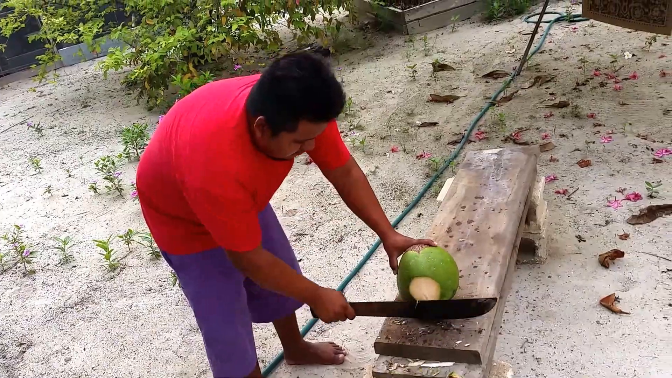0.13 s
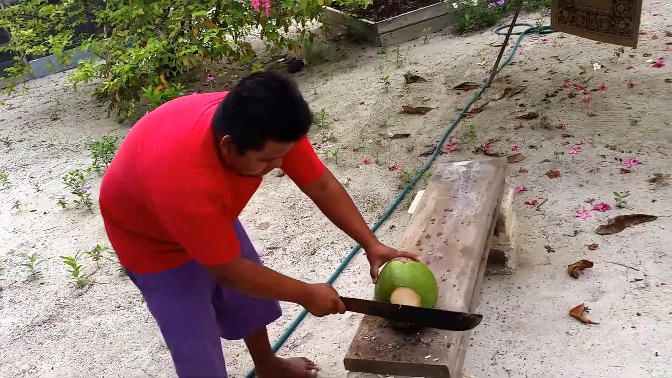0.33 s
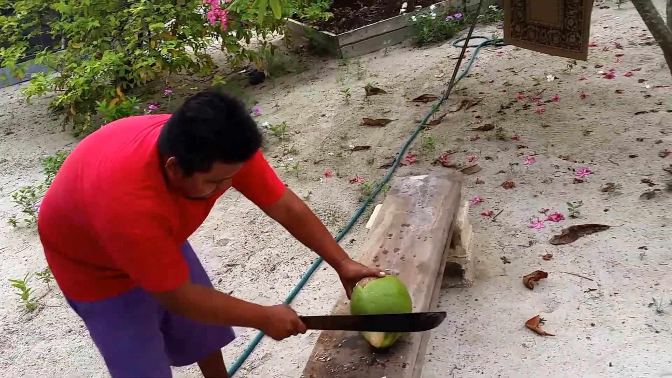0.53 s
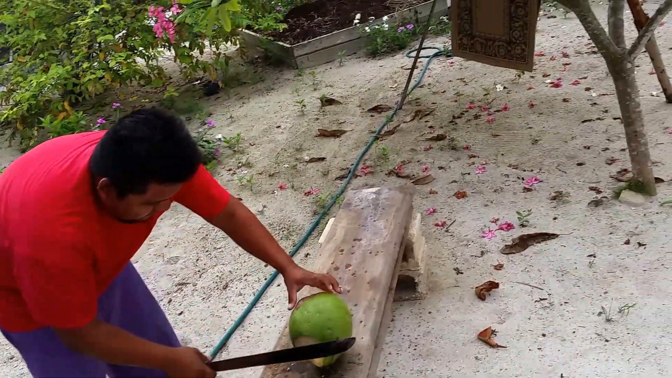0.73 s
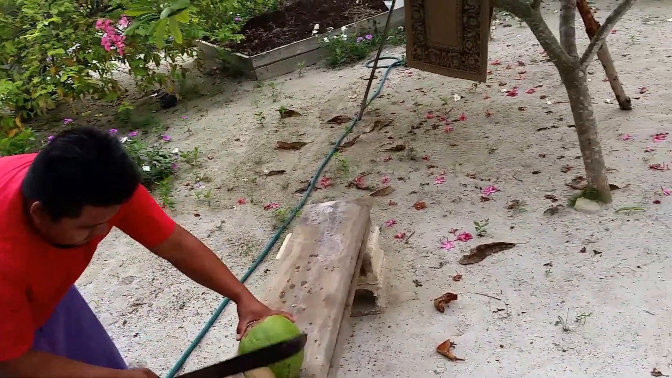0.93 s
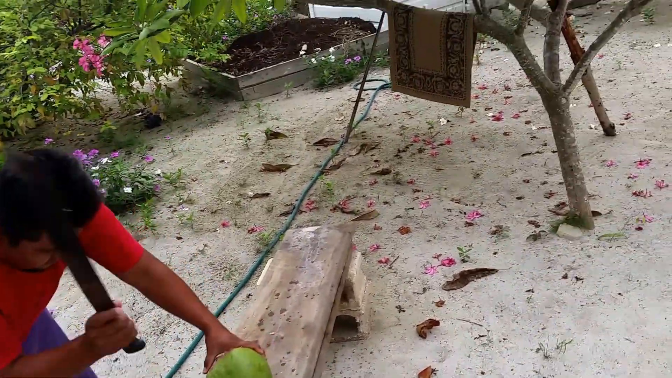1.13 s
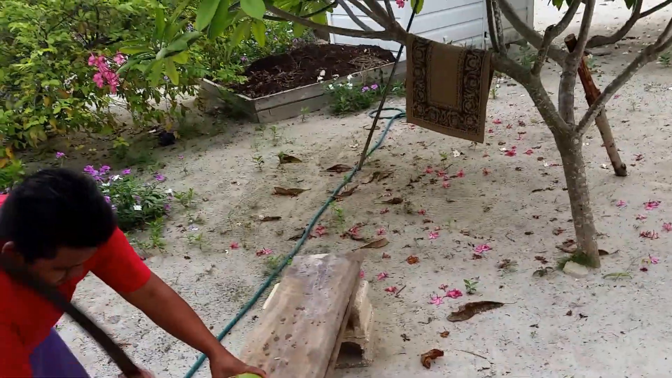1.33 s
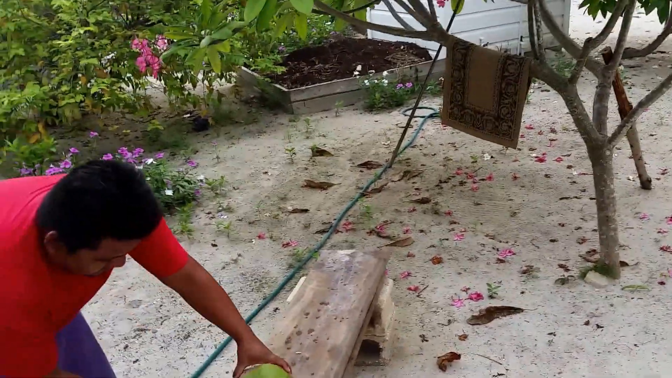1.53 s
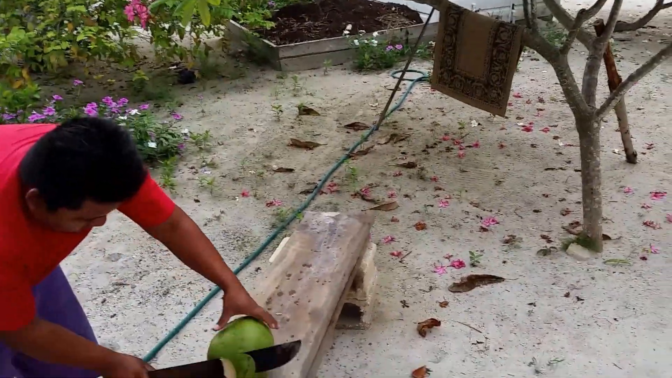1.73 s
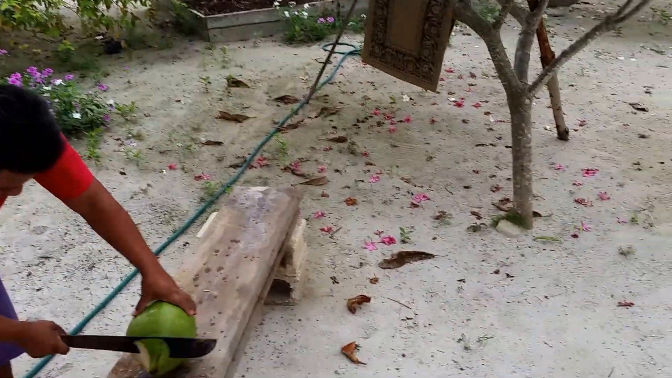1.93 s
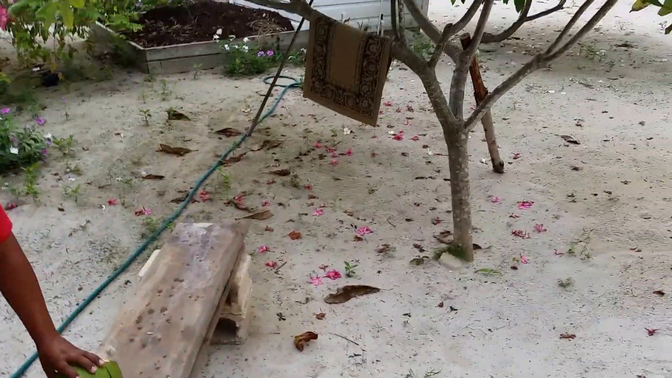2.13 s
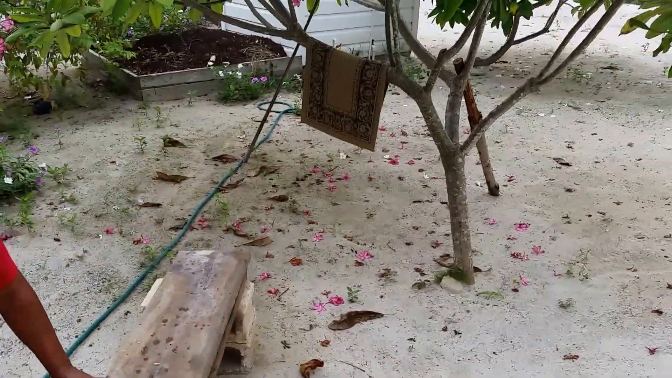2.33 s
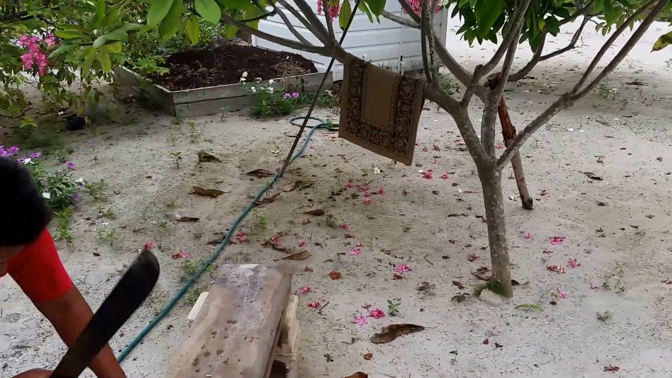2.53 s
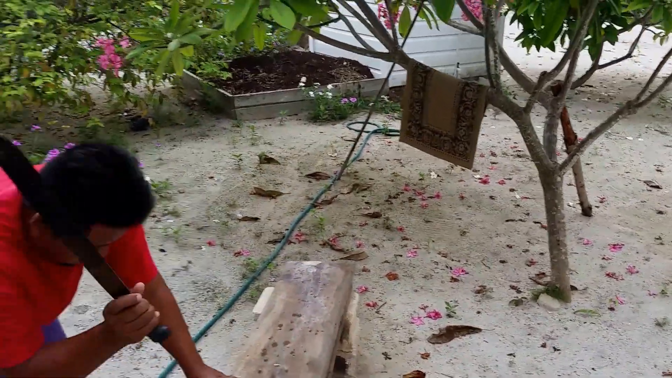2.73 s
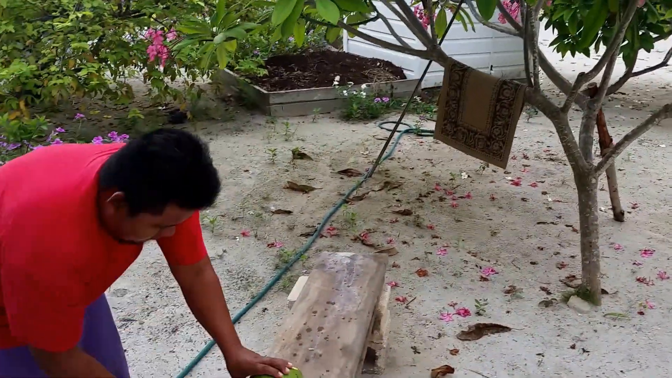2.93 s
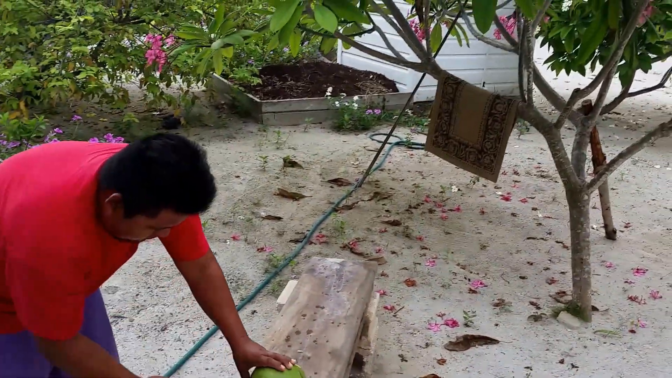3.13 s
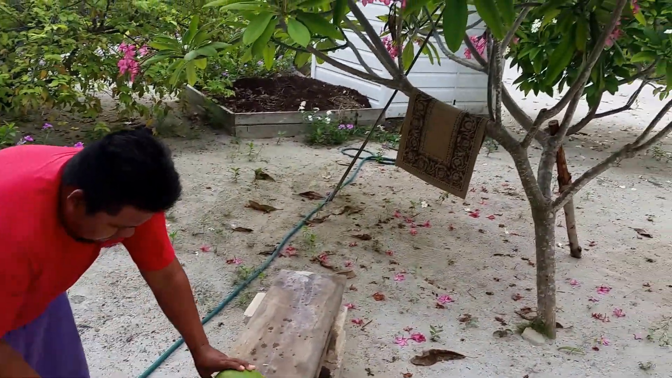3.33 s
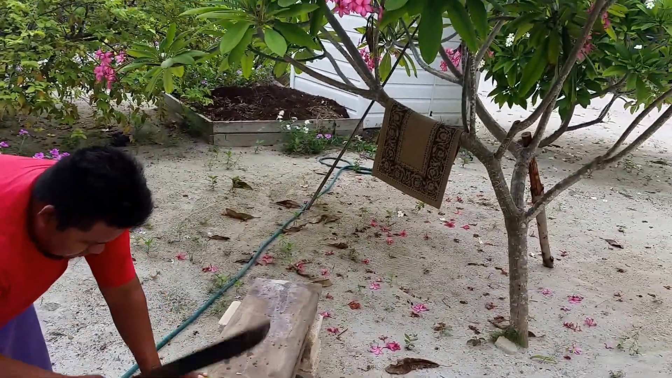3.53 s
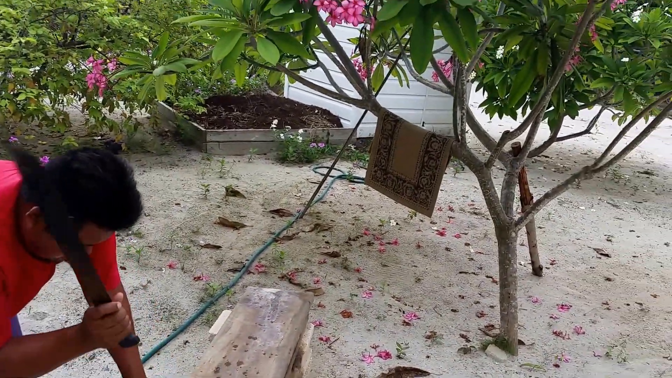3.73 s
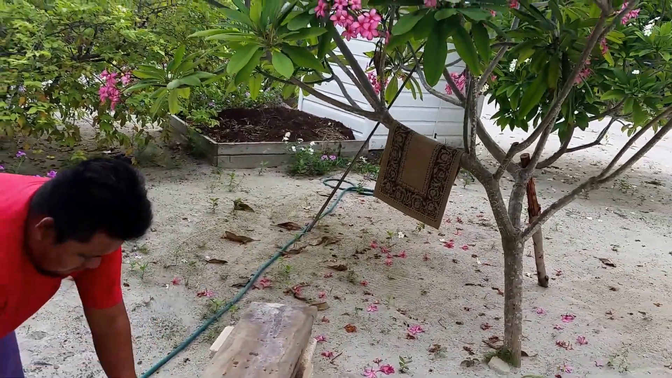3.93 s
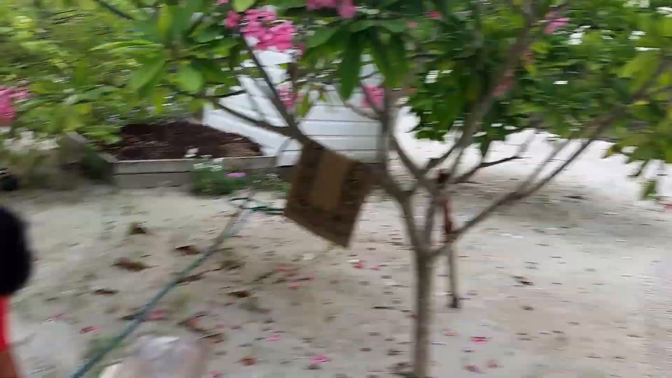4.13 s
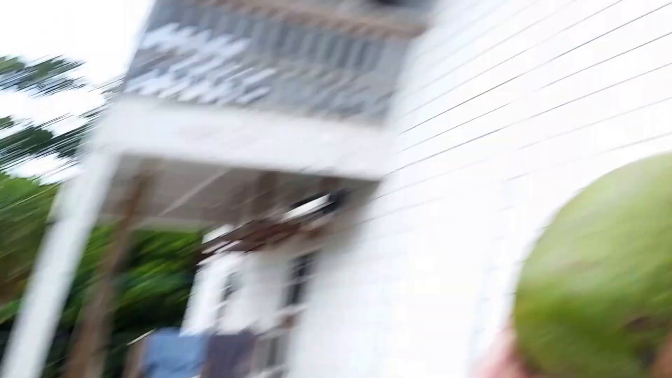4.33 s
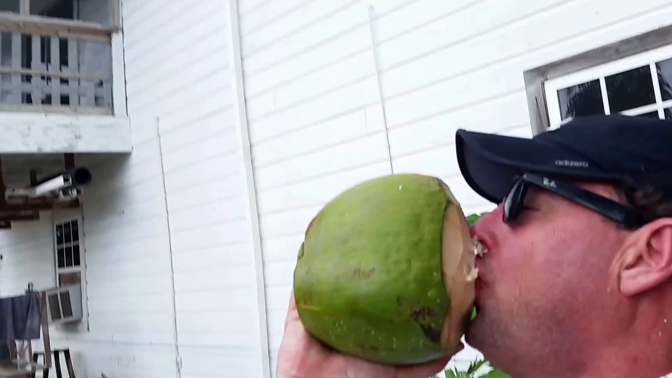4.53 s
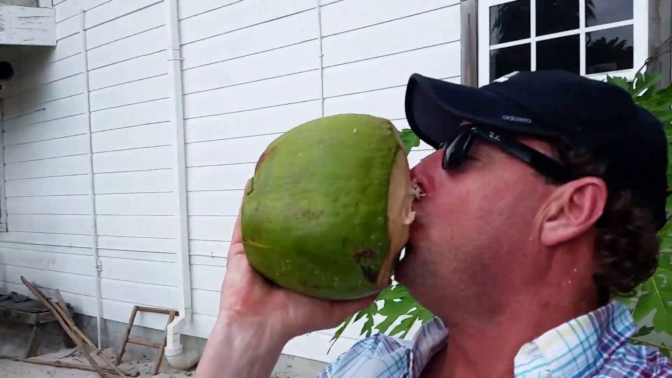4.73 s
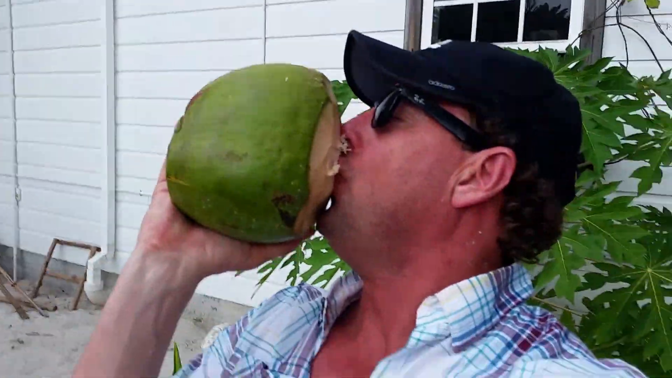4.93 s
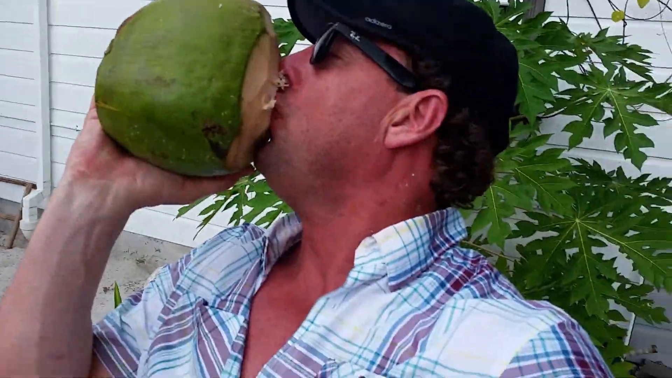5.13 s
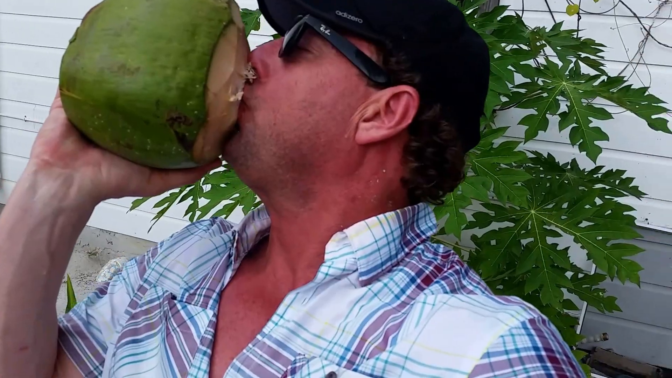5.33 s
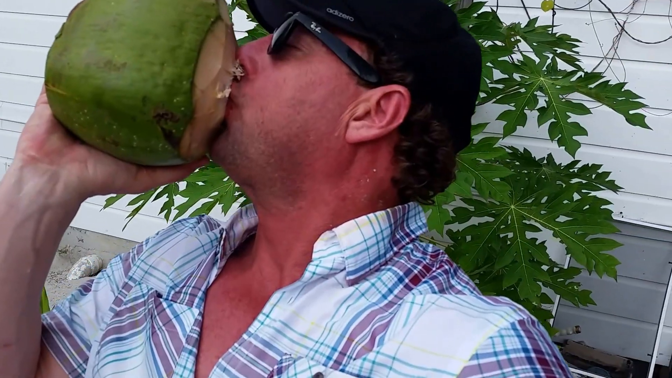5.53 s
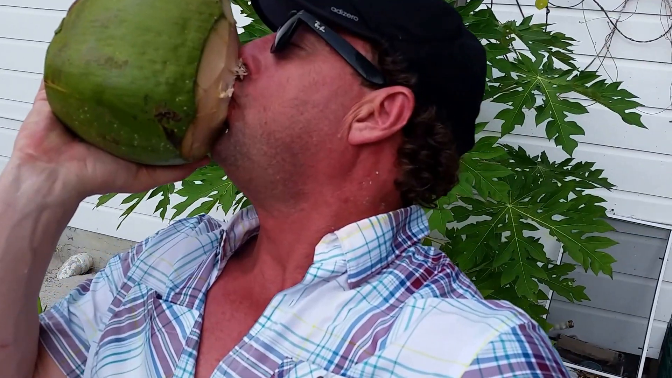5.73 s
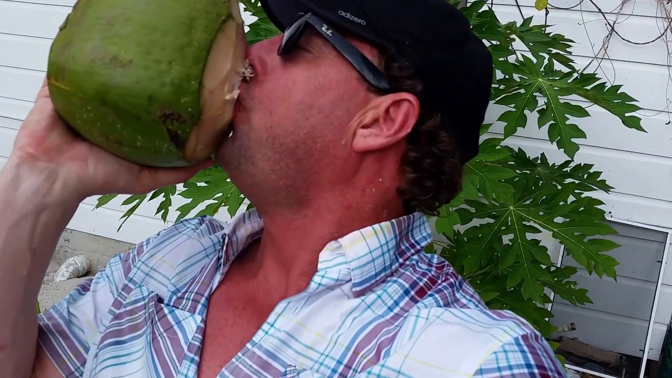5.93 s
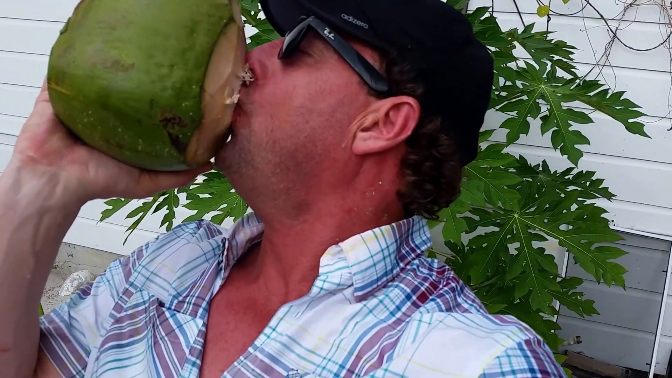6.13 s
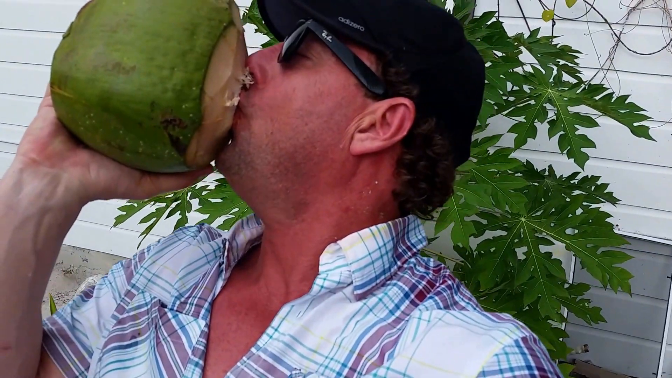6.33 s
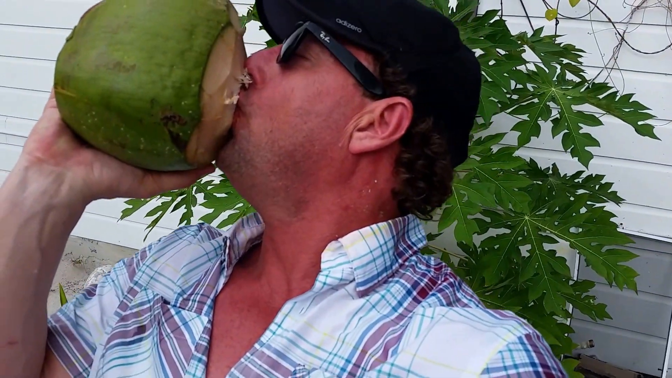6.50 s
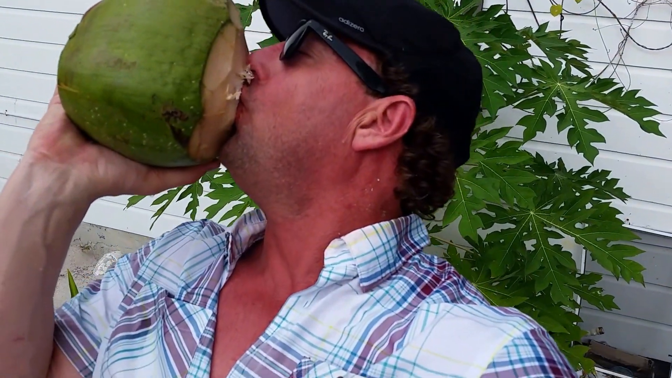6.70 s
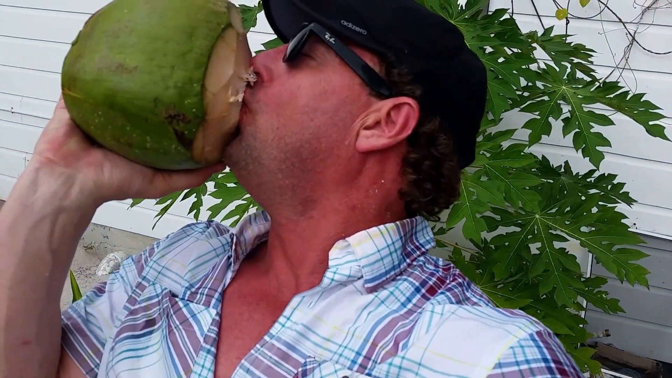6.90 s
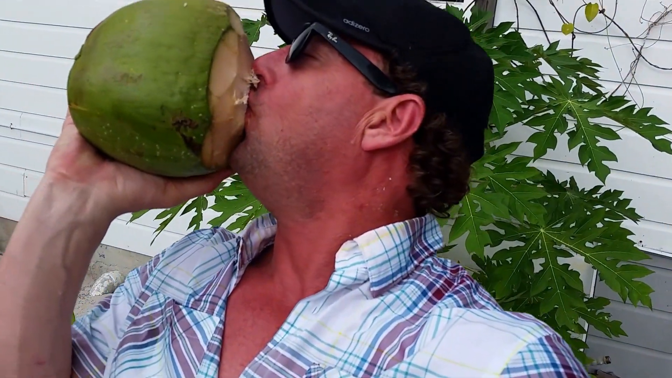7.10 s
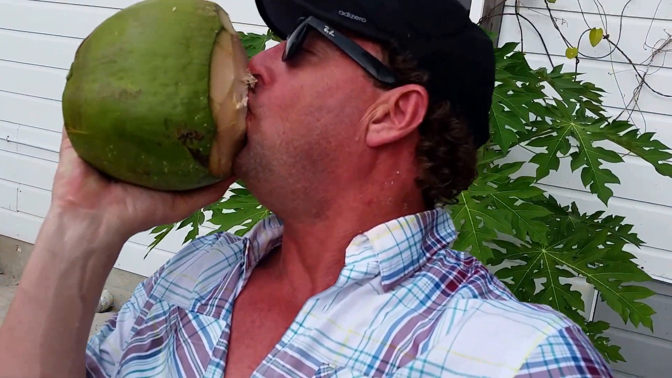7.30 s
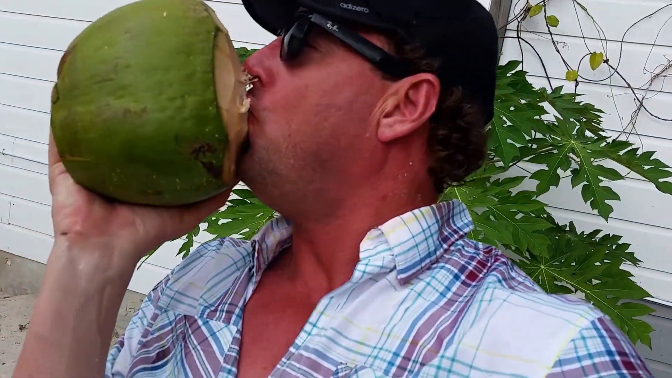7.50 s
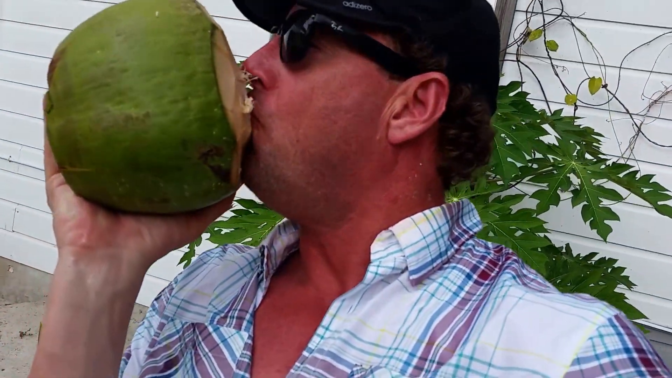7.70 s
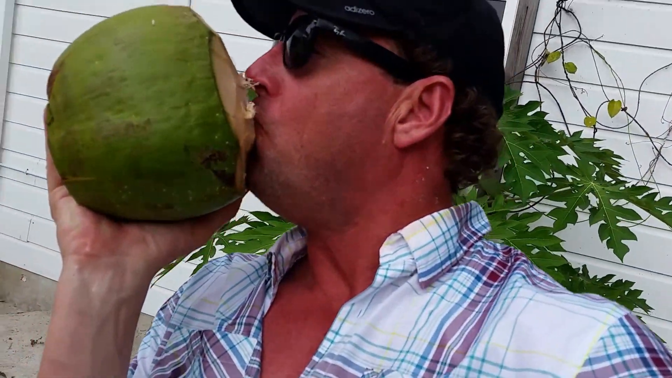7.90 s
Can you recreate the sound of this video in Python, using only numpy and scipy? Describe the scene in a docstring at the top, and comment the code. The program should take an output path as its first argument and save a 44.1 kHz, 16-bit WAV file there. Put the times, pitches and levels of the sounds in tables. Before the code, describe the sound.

An outdoor yard with soft air, leaves, low distant machine hum and a short diffuse echo. At 0.1 s a machete hits a coconut on a plank: the loudest woody crack, a wet crunch and a brief clatter. Light scrapes and tiny steel rings follow; at 0.8 s a snap and scrape, then a faint hoarse rising squeal until about 1.4. A chop at 1.54 brings several quick knocks until 1.8. Husk ticks and tears at 2.0-2.5. A chop at 3.06 leads to creaking fingers on the microphone and a dense, sharp ripping crackle at 3.3-3.5. A duller chop lands at 4.05, then bumps, low rumble, finger ticks and a click at 4.48. Another chop at 5.67, a rip at 5.9, and busy case creaks around 6.1-6.5. A chop at 6.66 precedes tearing, scraping and soft palm swishes, with a last crunchy cut at 7.9.

```python
"""A machete trims a green coconut on a wooden plank in a sandy yard: chops and rips burst wet husk fibres.
The blade also scrapes and levers slices off, tearing and snapping fibres (ticks ringing fibre modes).
Blade, nut and slices knock on the plank (struck modes and noise), and the steel rings and squeals.
A hand-held microphone creaks under the fingers, swishes under the palm and rumbles as it is moved.
Behind lie the yard's echo, open air, leaves (shaped noise) and the hum of far machines (sines)."""
import sys
import numpy as np
from scipy import signal
from scipy.fft import rfft, irfft
from scipy.io import wavfile
from scipy.ndimage import uniform_filter1d

SR = 44100
rng = np.random.default_rng(int(sys.argv[2]) if len(sys.argv) > 2 else 0)


def store_pcm(level_fs):
    """Save levels as 16-bit WAV."""
    pcm = np.round(np.clip(level_fs, -1, 1) * 32767).astype(np.int16)
    wavfile.write(sys.argv[1], SR, np.atleast_2d(pcm).T)


N = 351036
TIME = np.arange(N) / SR
AGE = TIME[:SR * 3 // 4]  # seconds since a strike, up to 0.75 s

# Table levels are relative: each function trims its own layers. A positive left_right_db is louder on the left.
# Modes of the steel blade, before the damping by husk: mode_hz, level_db, t60_s
BLADE = [(2580, 2.5, 0.5), (2716, 10, 0.14), (3190, 3, 0.8), (3740, -9, 0.69), (4226, -5.5, 0.55),
         (4630, 1.5, 0.71), (5002, 3, 0.5), (5930, 1.5, 0.355), (6400, -6.5, 0.5), (6360, -2, 0.24),
         (6900, -13, 0.45), (7478, -10, 0.85), (8300, -8.5, 0.42), (9000, -5.5, 0.25), (11080, -11.5, 0.6)]
# Colour of the nut's body, a power density: freq_hz, level_db
NUT_COLOUR = [(80, -21.5), (200, 13), (400, 0), (620, 4), (1000, 4), (1500, -3), (2300, -4), (3500, -23),
              (8000, -54.5)]
# Modes of the microphone's case: mode_hz, level_db, t60_s
CASE = [(1036, -1, 0.01), (2260, 2, 0.0057), (3370, -4, 0.005), (4100, -0.5, 0.0044), (5770, 1, 0.0049),
        (6550, 4, 0.0033), (7370, -1, 0.0038), (8320, 0.5, 0.0031), (10030, -10, 0.0045),
        (14200, -5, 0.0021)]


def chops(crunch_db=-7, thud_db=-1, steel_db=-17, stop_t60=0.03, nut_ring_db=-7,
          fibres_per_cut=70, entry_db=-1, entry_t60=0.0025, nut_t60=0.28):
    """A hard onset, then a run of bursting fibres, sparser in a long rip; the nut thuds and the steel rings."""
    # Blade cuts and longer rips of the husk:
    # start_s, crunch_db, length_s, thud_db, thud_hz, left_right_db, steel_ring_db
    cuts = [(0.08, -19, 0.01, -23.5, 1110, -3.5, -52), (0.1013, -18, 0.0026, -15.5, 1410, -6.5, -24),
            (1.536, -13, 0.0046, -17, 1490, -1, -73), (3.060, -15.5, 0.0052, -18.5, 1000, -4, -61),
            (3.297, -31.5, 0.067, -50, 1410, 1, -32), (4.053, -17, 0.0077, -20, 1060, -1, -33),
            (5.6741, -17.5, 0.0084, -21, 630, 4.5, -46), (5.895, -25, 0.024, -45, 587, 3, -40),
            (6.657, -12.5, 0.0026, -20, 430, 5, -32), (7.93, -16, 0.014, -32, 790, 4, -51)]
    # Colour of bursting wet husk, a power density: freq_hz, level_db
    crunch_colour = [(300, 10), (1200, -70), (2300, 4.5), (3500, 4), (7500, 7), (11000, -2.5), (16000, 2.5)]
    crunch, thud, steel = np.zeros((3, 2, N))
    entry = 1 + from_db(entry_db) * dying(entry_t60)
    blade_ring = steel_modes().sum(1)
    for s, db, length, nut_db, nut_hz, pan, ring_db in cuts:
        # The force lasts for the length of the cut or rip, then dies away
        force = entry * np.exp(-np.log(1000) * np.maximum(AGE - length, 0) / stop_t60)
        breaks = rng.random(len(AGE)) < fibres_per_cut / length / SR
        fibres = rms_one(np.sign(stereo_noise(0.7, size=len(AGE))) * breaks)
        add(crunch, s, from_db(db) * panned(pan) * fibres * force)

        push = stereo_noise(0.97, size=len(AGE)) * (force + from_db(nut_ring_db) * dying(nut_t60))
        body = signal.butter(1, [nut_hz / 2, nut_hz * 2], "band", fs=SR, output="sos")
        add(thud, s, from_db(nut_db) * signal.sosfilt(body, push))
        add(steel, s, from_db(ring_db + steel_db) * blade_ring)
    crunch = from_db(crunch_db) * coloured(crunch, crunch_colour)
    thud = from_db(thud_db) * coloured(thud, NUT_COLOUR)
    return crunch + thud + steel


def pings(focus_q=4):
    """The blade springs free or is tapped, and rings briefly in the modes near the contact's pitch."""
    # Touches on the steel: start_s, level_db, contact_hz
    touches = [(0.281, -52, 3500), (0.27, -52.5, 7700), (0.622, -73, 3560), (0.7, -67.5, 3260),
               (0.81, -48, 3230), (0.881, -51, 3200), (0.9, -54, 6700), (2.372, -55, 6600),
               (4.917, -41.5, 7940), (4.934, -64, 7760), (5.932, -54, 6650), (5.938, -45, 2350),
               (7.419, -50, 7700)]
    out = np.zeros((2, N))
    blade = steel_modes()
    for s, db, hz in touches:
        add(out, s, from_db(db) * favoured(BLADE, hz, focus_q) @ blade)
    return out


def tearing(level_db=-9.0, ticks_per_s=400, spread_db=4.0, rasp_db=-6, snap_db=-8.0,
            rise_s=0.0001, vary_db=3.0, size=1024):
    """Husk gives way: a fine rasp, uneven ticks and loud snaps ring the fibres in a mix that keeps shifting."""
    # Husk scraped or levered apart: start_s, attack_s, hold_s, release_t60_s, level_db, left_right_db
    tears = [(0.803, 0.0074, 0.02, 0.54, -46, -5), (2.038, 0.077, 0.22, 0.26, -47, 2.5),
             (2.25, 0.029, 0.0083, 0.055, -44, 4), (2.315, 0.012, 0.033, 0.16, -36.5, 2.5),
             (2.403, 0.01, 0.0093, 0.056, -35.5, 2.5), (3.15, 0.018, 0.17, 0.1, -42.5, -1),
             (3.29, 0.017, 0.035, 0.18, -24.5, -0.5), (3.365, 0.054, 0.061, 0.43, -32, -0.5),
             (5.879, 0.0058, 0.024, 0.43, -35.5, 11), (6.787, 0.03, 0.11, 0.42, -36.5, 1.5),
             (7.161, 0.16, 0.098, 0.087, -43, 9.5)]
    # Single fibre bundles breaking: start_s, level_db, left_right_db
    snaps = [(0.508, -29.5, -11), (0.7967, -19, -5), (0.805, -23, -2), (2.104, -28, 2), (2.134, -27, 2),
             (2.199, -20, 2), (2.286, -15, -4), (2.339, -19, 7), (2.355, -17, -4), (2.368, -28, 0),
             (2.421, -14.5, -5), (3.288, -6, 8), (3.301, -2, -3), (3.3052, -7, -2), (3.309, -9, 0),
             (3.3178, 1, -3), (3.326, -4, 2), (3.3361, -3, 0), (3.418, -17, -5), (3.43, -3, -4),
             (3.453, -7, 2), (3.463, -7, 2), (3.472, -14, 4), (3.5, -7.5, -9), (5.8954, -5.5, 8),
             (5.9, -17, 5), (5.934, -8, 0), (6.882, -12, 0), (7.047, -15, 5.5), (7.25, -22, 11),
             (7.415, -15, 8), (7.868, -6, -5)]
    # Fibre bundles ring for an instant as they break: mode_hz, level_db, t60_s
    fibre_modes = [(1000, 7.5, 0.0037), (1840, 1.5, 0.014), (2530, 7.5, 0.0022), (4430, 2.5, 0.0042),
                   (5510, 8.5, 0.001), (5900, 0.5, 0.006), (7280, 4.5, 0.0068), (8460, 0, 0.012),
                   (10070, 3.5, 0.0024), (11250, -2.5, 0.0063), (12700, 3.5, 0.0022), (14600, 3.5, 0.0041)]
    to_right_db = 3  # tears and snaps all lie this much further right than their tables say
    effort = sum(from_db(db) * panned(pan - to_right_db) * gesture(*shape) for *shape, db, pan in tears)

    strength = from_db(spread_db * np.minimum(rng.exponential(1, N), 2))
    ticks = (rng.random(N) < ticks_per_s / SR) * strength
    # Even out the local power of the ticks
    ticks /= np.sqrt(np.abs(uniform_filter1d(ticks ** 2, size=3000)) + 1e-4)
    force = from_db(level_db) * effort * (ticks + from_db(rasp_db) * stereo_noise(0.035))
    for s, db, pan in snaps:
        add(force, s, from_db(db + snap_db) * panned(pan - to_right_db))

    out, age = 0, AGE[:size]
    for hz, db, t60 in fibre_modes:
        ring = np.sin(2 * np.pi * (hz * age + rng.random((2, 1)) / 2))
        ring = ring * dying(t60)[:size] * (1 - np.exp(-age / rise_s))
        ring /= np.linalg.norm(ring[0])
        drive = force * rng.choice([-1, 1], N) * swelling(vary_db, hold_s=0.011)
        out = out + from_db(db) * signal.oaconvolve(drive, ring, axes=1)[:, :N]
    return out / np.linalg.norm(from_db(np.array(fibre_modes)[:, 1]))


def sliding(rub_db=-11, dragged_t60=0.2):
    """Friction hisses, makes the blade sing and, under pressure, rasps in the nut."""
    # Blade sliding over the husk; the singing is relative to the level:
    # start_s, attack_s, hold_s, release_t60_s, level_db, pressure_db, singing_db
    strokes = [(0.328, 0.027, 0.015, 0.067, -44.5, -59.5, -18.5),
               (0.584, 0.044, 0.0085, 0.064, -45.5, -69.5, -15.5),
               (0.791, 0.005, 0.013, 0.45, -33, -60, -23), (0.802, 0.074, 0.2, 0.36, -47.5, -48, -15),
               (1.353, 0.076, 0.063, 0.33, -40, -50.5, -37), (7.416, 0.14, 0.51, 0.26, -45.5, -49.5, -21),
               (7.846, 0.024, 0.015, 0.14, -40, -53, -20)]
    # Colour of rubbed steel, a power density: freq_hz, level_db
    rub_colour = [(500, -30), (2000, -23), (3200, 4.5), (4500, 6), (8000, 4), (11000, -13.5), (16000, -1.5)]
    speed, pressure, singing = np.zeros((3, N))
    for *shape, db, pressure_db, sing_db in strokes:
        stroke = gesture(*shape)
        speed += from_db(db) * stroke
        pressure += from_db(pressure_db) * stroke
        singing += from_db(db + sing_db) * stroke
    friction = coloured(stereo_noise(0.98) * swelling(depth_db=2.0, hold_s=0.005), rub_colour)
    # Dragging over the husk damps the blade further
    steel = ringing(BLADE).sum(0) * dying(dragged_t60)
    song = signal.oaconvolve(singing * friction, steel[None] / np.linalg.norm(steel), axes=1)[:, :N]
    rasp = coloured(pressure * rng.standard_normal(N), NUT_COLOUR)
    return from_db(rub_db) * speed * friction + song + rasp


def squealing(start_hz=3140, rise_hz_per_s=670, level_db=-55, width_hz=110):
    """The dragged blade squeals faintly at a rising pitch, made hoarse by a slow random flutter."""
    # The drag: start_s, attack_s, hold_s, release_t60_s
    drag = (0.93, 0.048, 0.17, 0.28)
    hz = start_hz + rise_hz_per_s * (TIME - drag[0])
    lowpass = signal.butter(2, width_hz, fs=SR, output="sos")
    flutter = rms_one(signal.sosfilt(lowpass, stereo_noise(0.36)))
    return from_db(level_db) * gesture(*drag) * flutter * np.sin(2 * np.pi * np.cumsum(hz) / SR)


def knocks(ring_db=-8, clatter_db=-17, clatter_t60=0.17, contact_q=1.155, rise_s=0.0002,
           crack_trim_db=-8, crack_hz=(1150, 1700), crack_t60=0.039, load_detune=0.008, loaded_t60=0.6):
    """Each landing cracks and drives the plank's modes near its contact pitch, over a short woody clatter."""
    # Blade, nut and slices landing on the plank; the crack is relative to the level, before its trim:
    # start_s, level_db, contact_hz, crack_db
    landings = [(0.1058, 2, 986, -5.5), (0.1261, -5.5, 900, -11), (0.1371, -10.5, 960, 3),
                (0.649, -32.5, 600, -27), (0.799, -28.5, 360, -28), (0.925, -30, 460, -27),
                (1.548, -15, 730, -13), (1.566, -23, 1100, -6), (1.6, -3, 670, 0), (1.629, -13, 730, -12),
                (1.6416, -6, 713, -1), (1.672, -37, 895, -10), (1.783, -12.5, 623, -6.5),
                (1.813, -40, 1090, -12), (3.121, -21.5, 460, -30), (3.17, -30.5, 1130, -8),
                (3.303, -30, 1310, 2), (4.121, -16, 550, -22), (4.331, -22, 620, -23),
                (4.424, -24.5, 456, -22), (5.689, -16.5, 715, -13), (5.722, -21.5, 417, -20),
                (6.737, -14.5, 480, -24), (6.757, -20, 406, -32), (6.96, -30.5, 510, -20)]
    # Modes of the plank, before the load detunes and damps them: mode_hz, level_db, t60_s
    plank = [(260.4, 4, 0.13), (375.4, -1.5, 0.12), (525, -9, 0.18), (601.4, 0.5, 0.17), (692.6, -3.5, 0.1),
             (769.6, 0, 0.08), (814, -7, 0.1), (887, -2.5, 0.098), (990, -7, 0.13), (1142, -4.5, 0.065),
             (1290, -0.5, 0.1), (1390, -8.5, 0.078), (1488, -7.5, 0.067), (1712, -2.5, 0.13),
             (1950, -7.5, 0.13), (2200, -8, 0.14)]
    out = np.zeros((2, N))
    for s, db, hz, crack_db in landings:
        # The load shifts from knock to knock and retunes the modes (detune is a share of their pitch)
        modes = ringing(plank, load_detune)
        ring = from_db(ring_db) * favoured(plank, hz, contact_q) @ modes * dying(loaded_t60)
        clatter = from_db(clatter_db) * burst([hz * 0.52, hz * 1.38], clatter_t60, 0.96)
        crack = from_db(crack_db + crack_trim_db) * burst(crack_hz, crack_t60, 1.0)
        add(out, s, from_db(db) * (ring + clatter + crack) * (1 - np.exp(-AGE / rise_s)))
    return out


def yard_echo(x, wet_db=-10, build_s=0.0066, bass_db=-4, yard_t60=0.33):
    """Walls, trees and ground scatter the sound back, differently to each side."""
    scatter = rng.standard_normal((2, len(AGE))) * dying(yard_t60) * (1 - np.exp(-AGE / build_s))
    echo = signal.oaconvolve(x, scatter / np.linalg.norm(scatter[0]), axes=1)[:, :N]
    return coloured(echo, [(700, wet_db + bass_db), (3000, wet_db), (16000, wet_db + 4.0)], keep_power=False)


def grip(count=1400, stick_s=0.0055, stick_spread=0.6, slip_spread_db=3,
         loud_db=-3.5, creep_db=-5, rasp_db=-21, swell_db=1.5):
    """Fingers stick and slip on the case in uneven runs that swell and fade, over the rasp of dragging skin."""
    # Fingers creeping on the case: start_s, attack_s, hold_s, release_t60_s, typical_slip_db, left_right_db
    creeps = [(3.15, 0.018, 0.15, 0.2, -27, -8), (3.824, 0.047, 0.38, 0.23, -41.5, -1),
              (4.168, 0.025, 0.29, 0.3, -33.5, -4.5), (4.506, 0.044, 0.12, 1, -35, -2.5),
              (4.7, 0.071, 0.4, 1.0, -36, -0.5), (5.591, 0.19, 0.15, 0.51, -28, -3),
              (5.98, 0.078, 0.29, 0.88, -30, -0.5), (6.372, 0.023, 0.067, 0.82, -38, 0)]
    # Loud slips of a finger on the case: start_s, level_db, left_right_db
    loud_slips = [(3.1677, -14.5, -7), (3.1735, -17.5, -2), (3.1812, -20, -7), (3.1888, -19, -5),
                  (3.2, -19, -2), (3.2024, -24, -3), (3.23, -23, 0), (3.2552, -20, -2), (3.271, -19.5, -4),
                  (4.213, -25.5, 0), (4.2232, -25.5, -3), (4.2354, -24, -1), (4.287, -30, -2),
                  (4.379, -24, -9), (4.3867, -26.5, -11), (4.417, -25, -8), (4.4485, -27, 0),
                  (4.5408, -24, -2), (4.64, -23, 0), (5.0213, -24.5, -3), (5.1032, -29.5, -5),
                  (5.1505, -36, -8), (5.7675, -28, 2), (5.817, -25, -2), (5.833, -25.5, 0.5),
                  (5.866, -23, -6), (6.092, -23.5, 3), (6.1223, -18.5, -1), (6.1398, -19, -4),
                  (6.1585, -17.5, 0), (6.1687, -24, 1), (6.1785, -18, -2), (6.192, -19, -1),
                  (6.2026, -23, -1), (6.2857, -24.5, -4), (6.309, -27, 0), (6.378, -23.5, -1),
                  (6.3835, -21, -2), (6.4635, -32, 3), (6.5353, -25, -4)]
    effort = sum(from_db(db) * panned(pan) * gesture(*shape) for *shape, db, pan in creeps)
    effort = effort * swelling(swell_db, hold_s=0.05)

    case_ring = ringing(CASE).sum(0)
    skin = stereo_noise(0.058) * swelling(depth_db=4.5, hold_s=0.005)
    rasp = signal.oaconvolve(skin, case_ring[None], axes=1)[:, :N]
    out = from_db(rasp_db) * effort * rms_one(rasp)

    # The finger sticks for an uneven while between slips
    waits = stick_s * np.exp(stick_spread * rng.standard_normal(count))
    for s in np.cumsum(waits):
        if s < TIME[-1]:
            vary = from_db(slip_spread_db * np.minimum(rng.standard_normal(), 1))
            force = effort[:, int(s * SR), None] * vary + 1e-9
            balance = force / force.mean()
            add(out, s, from_db(creep_db) * balance * slip(20 * np.log10(force.mean())))
    for s, db, pan in loud_slips:
        add(out, s, from_db(loud_db) * panned(pan) * slip(db))
    return out


def slip(db, chief_hz=6860, focus=5.0, vary_db=3, rise_s=0.00036, size=320):
    """One slip rings the case for milliseconds, mixed anew; harder ones favour its chief resonance."""
    hz, mode_db, t60 = np.transpose(CASE)[..., None]
    age = AGE[:size]
    strength = from_db(mode_db + vary_db * rng.standard_normal(hz.shape))
    strength = strength * favoured(CASE, chief_hz, focus * from_db(db))[:, None]
    phase = rng.random((2, len(CASE), 1))  # differs at each port
    rings = strength * np.sin(2 * np.pi * (hz * age + phase)) * np.exp(-np.log(1000) * age / t60)
    tick = rings.sum(1) * (1 - np.exp(-age / rise_s)) ** 2
    return from_db(db) * tick / np.abs(tick).max(1, keepdims=True)


def case_click(top_hz=3500):
    """One sharp click of the case, close to the left port: a very short, dulled burst of noise."""
    # The click: start_s, level_db, left_right_db, t60_s
    s, db, pan, t60 = (4.4845, -12.5, 8, 0.003)
    lowpass = signal.butter(1, top_hz, fs=SR, output="sos")
    click = signal.sosfilt(lowpass, stereo_noise(0.83, size=len(AGE)) * dying(t60))
    out = np.zeros((2, N))
    add(out, s, from_db(db) * panned(pan) * click)
    return out


def palm(grain_db=4):
    """Skin rubbing over the case makes an uneven, soft swish, strongest near 2 kHz."""
    # Rubs of the palm: start_s, attack_s, hold_s, release_t60_s, level_db
    rubs = [(4.082, 0.3, 0.9, 0.4, -60), (5.537, 0.17, 0.7, 1.2, -49), (7.26, 0.7, 0.25, 0.3, -44.5)]
    # Colour of the swish, a power density: freq_hz, level_db
    swish_colour = [(800, -22), (1500, -6), (2050, 8.5), (2500, -3), (3100, -13), (4500, -15.5),
                    (8000, -14), (11000, -24.5), (15000, -9)]
    speed = sum(from_db(db) * gesture(*shape) for *shape, db in rubs)
    return speed * swelling(grain_db, hold_s=0.0071) * coloured(stereo_noise(0.35), swish_colour)


def handling(slow_level, rumble_db=-1, swell_db=4, bump_t60=0.022):
    """Air and hand rumble on the moved microphone as low noise; soft bumps on its case are dying sines."""
    # The microphone is moved: start_s, attack_s, hold_s, release_t60_s, level_db
    moves = [(1.17, 0.48, 0.15, 0.24, -44), (4.16, 0.15, 0.21, 1.9, -37.5), (4.61, 0.31, 0.31, 1.6, -44),
             (5.5, 0.27, 0.063, 1.5, -42), (6.36, 0.38, 0.11, 0.62, -47), (7.38, 0.052, 0.19, 1.1, -48.5)]
    # Soft bumps on the case: start_s, level_db, pitch_hz
    bumps = [(2.069, -13, 86), (4.237, -21, 171), (4.311, -12, 54.3), (4.429, -15.5, 79),
             (4.484, -20.5, 434), (4.905, -25, 131), (5.063, -37, 64), (5.111, -28, 110), (7.195, -33, 257)]
    # Colour of the rumble, a power density: freq_hz, level_db
    rumble_colour = [(20, -6.5), (55, 1), (100, -3), (160, -7.5), (260, -15.5), (450, -41.5), (1500, -57)]
    rumble = from_db(rumble_db) * slow_level + sum(from_db(db) * gesture(*shape) for *shape, db in moves)
    out = rumble * coloured(stereo_noise(0.33), rumble_colour) * panned(5.2) * swelling(swell_db, hold_s=0.04)
    for s, db, hz in bumps:
        add(out, s, from_db(db) * np.sin(2 * np.pi * hz * AGE) * dying(bump_t60))
    return out


def open_air(slow_level, leaves_db=-11):
    """Air and leaves are shaped noise; far machines hum in sines that sink and recover with it, two beating."""
    # Colours of open air and of leaves, power densities: freq_hz, level_db
    air_colour = [(100, 9), (240, 10), (400, 7), (1000, 2.5), (1600, -9.5), (3000, -37), (8000, -45)]
    leaves_colour = [(500, 8), (2200, 13.5), (3500, 3.5), (7500, 3), (10000, -10), (16000, -7)]
    # Hum of distant machines, relative to the open air: pitch_hz, level_db
    hum_lines = [(57.5, -2.5), (177.3, 1), (174, -7)]
    air = coloured(stereo_noise(0.53), air_colour)
    leaves = from_db(leaves_db) * coloured(stereo_noise(0.065), leaves_colour)
    hum = sum((-1) ** k * from_db(db) * np.sin(2 * np.pi * hz * TIME) for k, (hz, db) in enumerate(hum_lines))
    return slow_level * (air + leaves + hum)


def background():
    """One slow level curve, sinking after the first blow and recovering, drives air, leaves, hum, base rumble."""
    # Slow level of these layers: time_s, level_db
    slow_curve = [(0.0, -48), (0.46, -57), (1.48, -50), (7.8, -50)]
    slow_level = from_db(np.interp(TIME, *np.transpose(slow_curve)))
    return handling(slow_level) + open_air(slow_level)


def from_db(db):
    """Decibels to gain."""
    return 10 ** (np.asarray(db) / 20)


def rms_one(x):
    """Scale to unit rms."""
    return x / np.sqrt(np.mean(x ** 2) + 1e-20)


def add(track, s, sound):
    """Mix a sound into a track from time s on."""
    start = int(s * SR)
    part = sound[..., :N - start]
    track[..., start:start + part.shape[-1]] += part


def panned(db):
    """Left and right gains for a level difference, left minus right."""
    return from_db(np.array([[0.5], [-0.5]]) * db)


def dying(t60):
    """Exponential decay by 60 dB in t60 seconds."""
    return np.exp(-np.log(1000) * AGE / t60)


def gesture(s, attack, hold, release, attack_power=1.24):
    """Gain of one movement: it builds up with a power of time, holds and dies away."""
    age = TIME - s
    fallen = np.clip((age - attack - hold) / release, 0, 2)
    return np.clip(age / attack, 0, 1) ** attack_power * np.exp(-np.log(1000) * fallen)


def swelling(depth_db, hold_s):
    """A gain that wanders at random, with a new aim every hold_s (5 ms or more)."""
    step = TIME / max(hold_s, 0.005)
    return from_db(depth_db * np.interp(step, np.arange(2000), rng.standard_normal(2000)))


def stereo_noise(likeness, size=N):
    """White noise, partly shared between the sides."""
    shared, own = rng.standard_normal(size), rng.standard_normal((2, size))
    return np.sqrt(likeness) * shared + np.sqrt(1 - likeness) * own


def burst(band_hz, t60, likeness):
    """A dying band of noise: many close, heavily damped modes."""
    band = signal.butter(4, band_hz, "band", fs=SR, output="sos")
    return rms_one(signal.sosfilt(band, stereo_noise(likeness, size=len(AGE)))) * dying(t60)


def ringing(modes, detune=0):
    """One row for each mode: a dying sine of random strength and phase, mistuned at random by a share."""
    rows = []
    for hz, db, t60 in modes:
        strength = from_db(db + 2 * rng.standard_normal())
        tuned_hz = hz * (1 + detune * rng.standard_normal())
        rows.append(strength * dying(t60) * np.sin(2 * np.pi * (tuned_hz * AGE + rng.random())))
    return np.array(rows)


def favoured(modes, hz, q):
    """A contact drives most strongly the modes near its own pitch."""
    mode_hz = np.array(modes)[:, 0]
    return 1 / (1 + (q * (mode_hz / hz - hz / mode_hz)) ** 2)


def steel_modes(rough=1.0, flutter_hz=60, wedged_t60=0.6):
    """The blade's modes for each side, made to flutter and damped by the husk that touches it."""
    lowpass = signal.butter(2, flutter_hz, fs=SR, output="sos")
    flutter = signal.sosfilt(lowpass, rng.standard_normal((2, len(BLADE), len(AGE))))
    sides = np.array([ringing(BLADE), ringing(BLADE)])
    return sides * (1 + rough * rms_one(flutter)) * dying(wedged_t60)


def coloured(x, spectrum, keep_power=True, size=4096):
    """Causal (minimum-phase) filter that follows a spectrum, by folding its cepstrum."""
    hz, db = np.transpose(spectrum)
    bin_hz = np.arange(size // 2 + 1) * SR / size
    gain = from_db(np.interp(np.log(bin_hz + 1), np.log(hz), db))
    cepstrum = irfft(np.log(rms_one(gain) if keep_power else gain))
    cepstrum[1:size // 2] *= 2
    cepstrum[size // 2 + 1:] = 0
    impulse = irfft(np.exp(rfft(cepstrum)))
    return signal.oaconvolve(np.atleast_2d(x), impulse[None], axes=1)[:, :N]


def scene():
    """The work reaches the right port a little late, with the yard's echo; the grip is heard dry via the case."""
    port_lag_s = 9e-5
    left, right = chops() + pings() + tearing() + sliding() + squealing() + knocks()
    work = np.array([left, np.interp(TIME - port_lag_s, TIME, right)])
    return work + yard_echo(work) + grip() + case_click() + palm() + background()


def record(dry, cutoff_hz=16000):
    """Each microphone port colours its side; peaks are rounded and the top is cut."""
    # Response of the two ports, each lifted in the treble: freq_hz, gain_db
    left_port = [(100, 2.5), (2000, -1), (3700, 1.5), (5500, -1.5), (7000, 10), (8100, 16), (9200, 13),
                 (10500, 1.5), (12000, -5), (15000, -3.5)]
    right_port = [(100, 2), (1000, -3.5), (3500, 0.5), (5000, 3.5), (6700, 8.5), (8000, 1), (9200, 0.5),
                  (11500, 3), (15000, 1)]
    ports = np.vstack([coloured(x, port, keep_power=False) for x, port in zip(dry, (left_port, right_port))])
    lowpass = signal.ellip(10, 0.2, 80, cutoff_hz, fs=SR, output="sos")
    return signal.sosfilt(lowpass, np.tanh(ports))


dry = scene()
out = record(dry)
store_pcm(out)
```